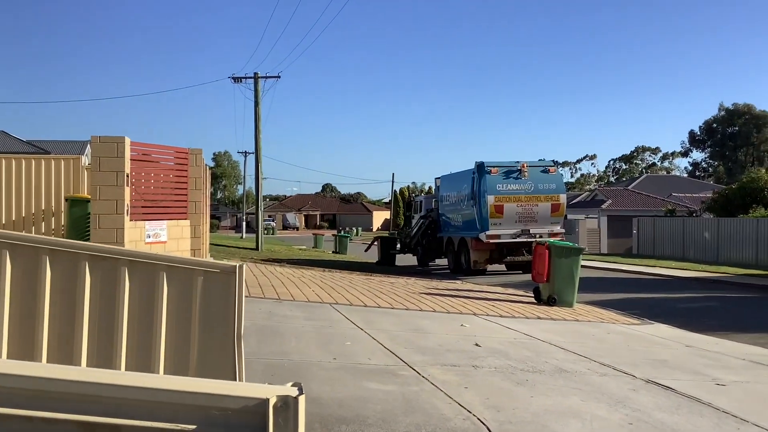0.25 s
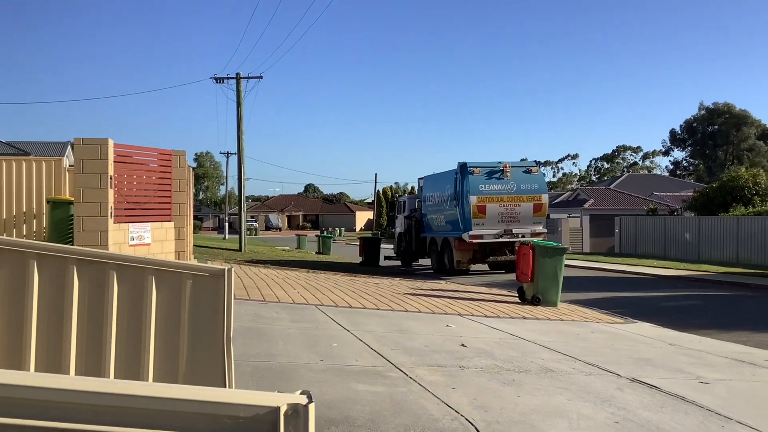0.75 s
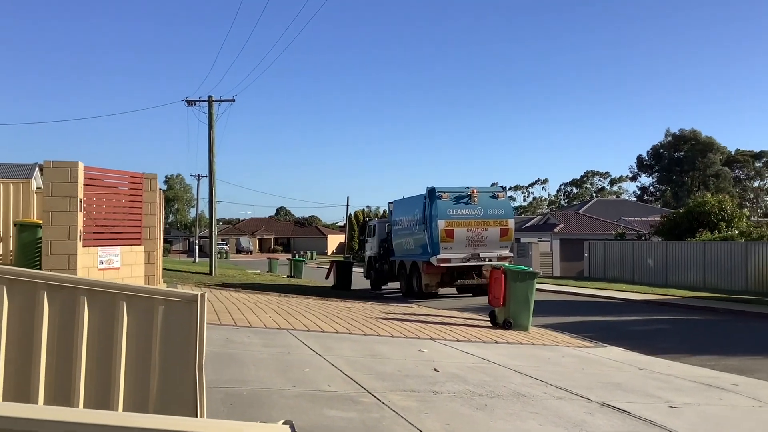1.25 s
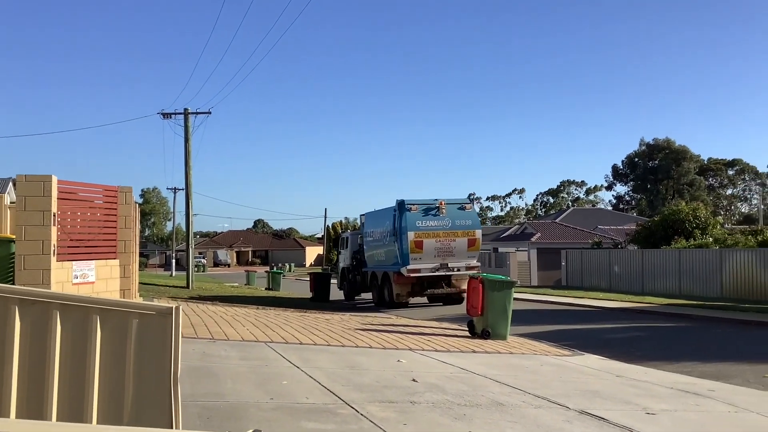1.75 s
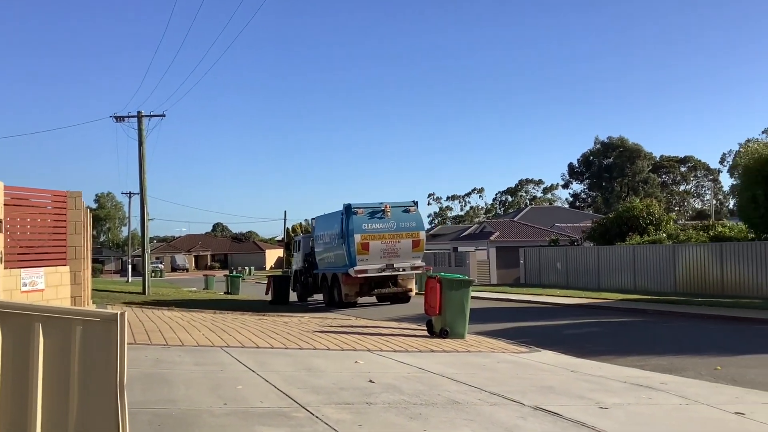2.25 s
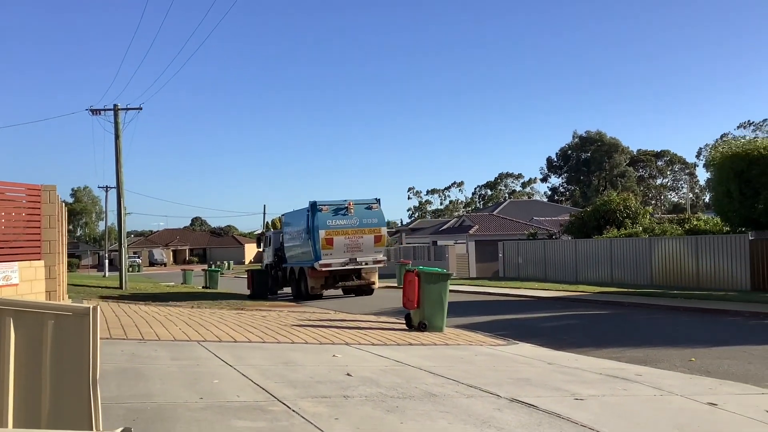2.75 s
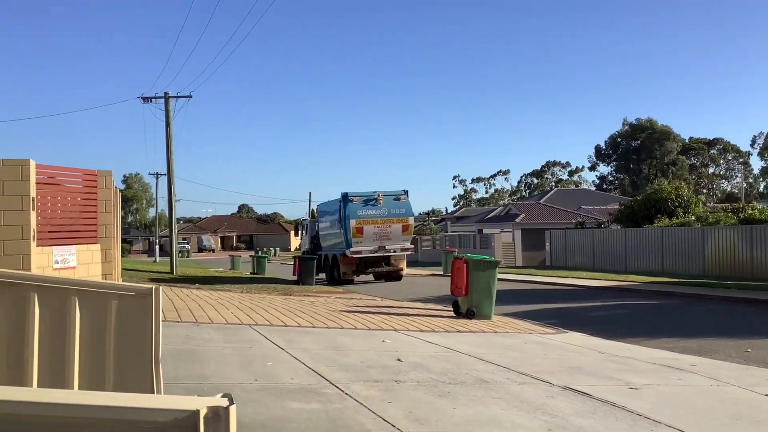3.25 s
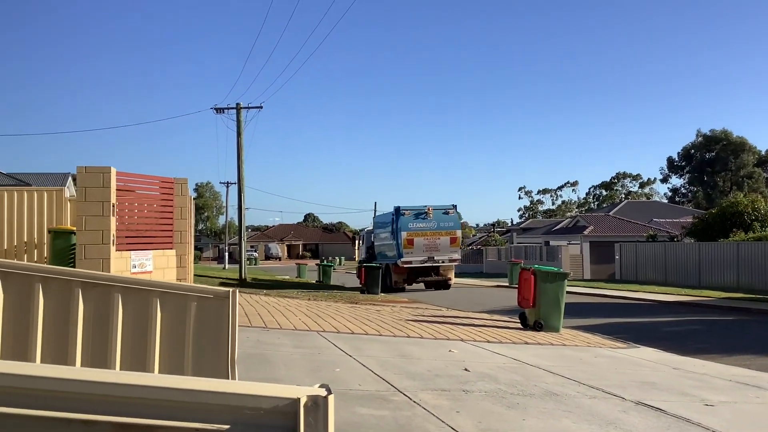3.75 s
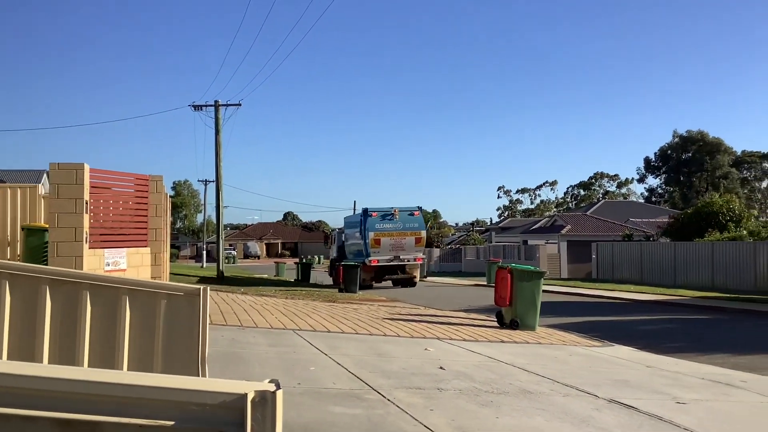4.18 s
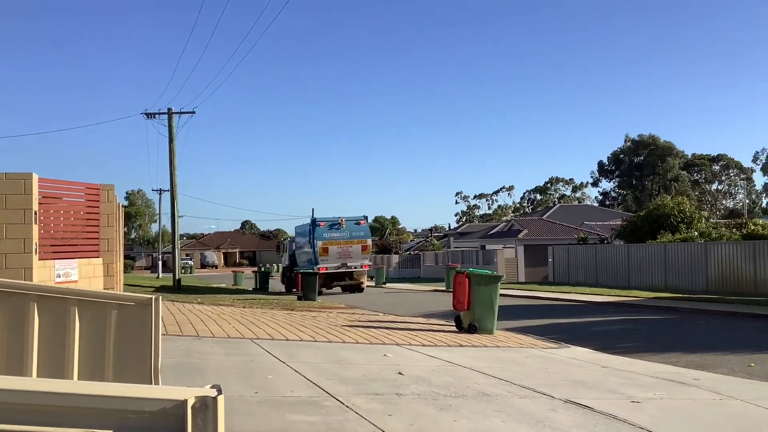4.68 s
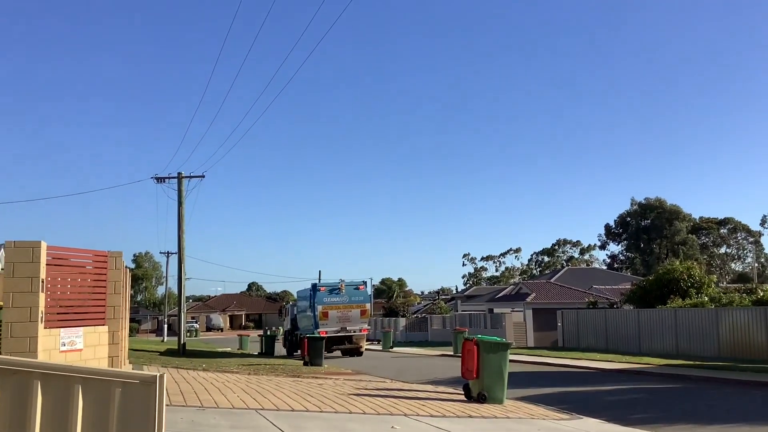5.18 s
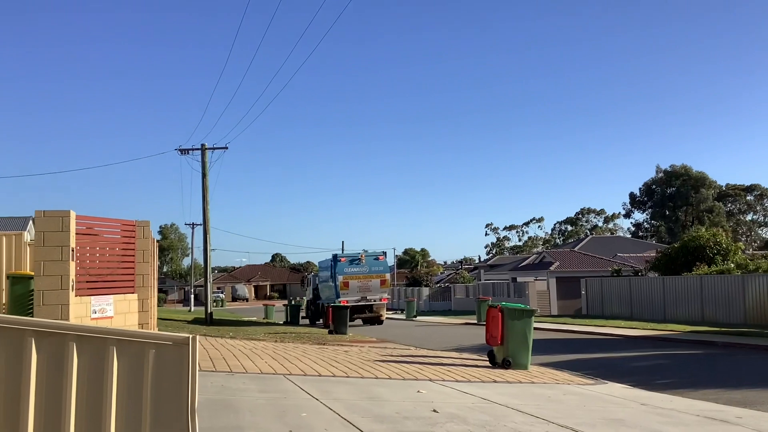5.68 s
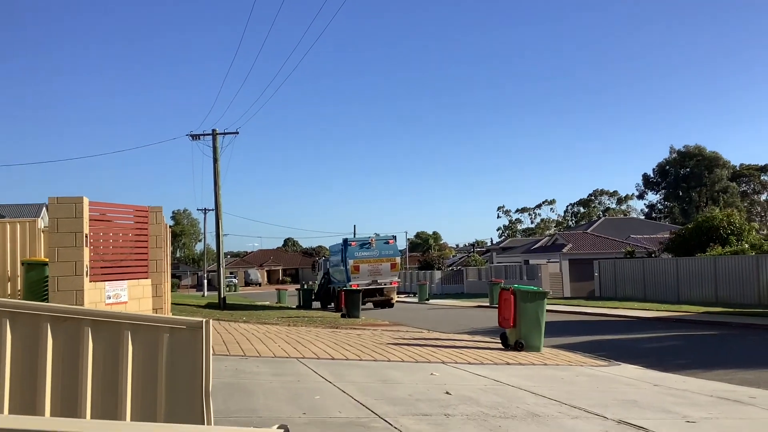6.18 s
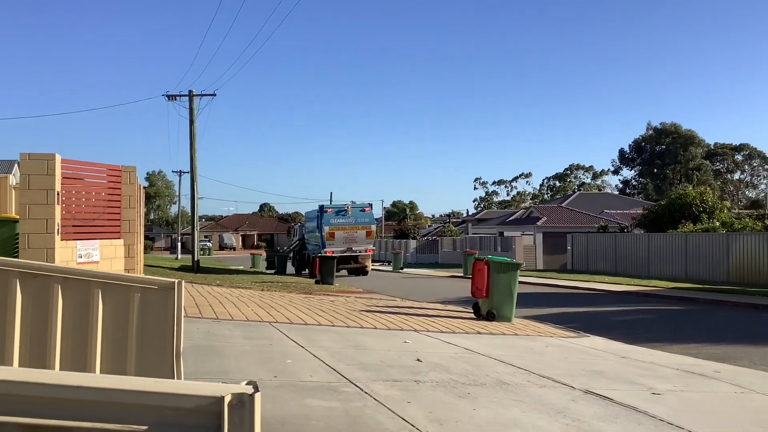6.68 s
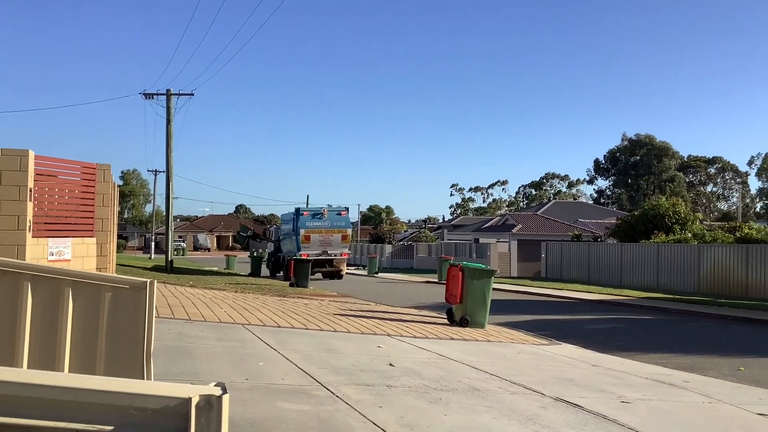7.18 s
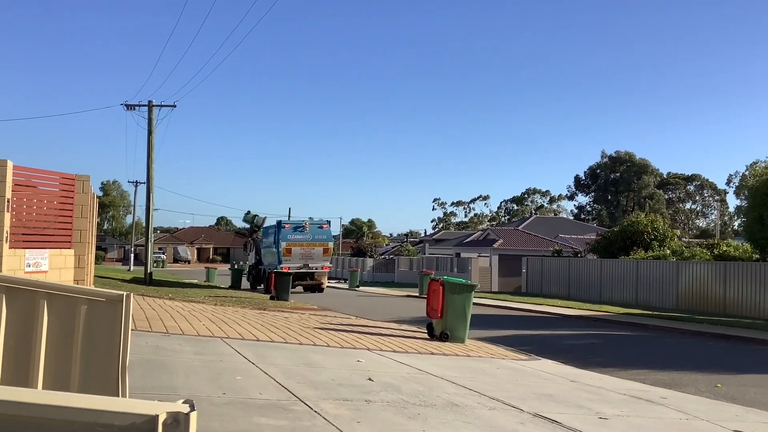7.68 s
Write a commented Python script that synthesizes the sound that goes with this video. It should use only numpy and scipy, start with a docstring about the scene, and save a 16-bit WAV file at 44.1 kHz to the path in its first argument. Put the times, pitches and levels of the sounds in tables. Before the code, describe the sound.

Outdoors on a suburban street, wind rumbles, flutters and thumps against a single phone microphone throughout. At 0 s a diesel refuse truck is running, with a short air puff and bright tick near 0.1 s. From about 0.6 s it pulls away, its growl and gear whine rising until 3.1 s under a thin, climbing turbo whistle; a longer air hiss comes at 1.2-1.5 s. The engine then drops quickly, reaching low idle by 4.7 s. Brake squeals begin around 4.1 s, high, rasping and overlapping, with a clear piercing note near 5.3 s, then fade into weaker squeaks until 6.4 s. Small air puffs sputter at 5.5-5.9 s. Steel clanks knock at 6.45-6.6 s, followed by faint regular chirps to about 7.2 s and a very faint hydraulic whine near 7.6 s. Wind is strong from 7.3 s to the end at about 7.9 s. Fences and houses lightly echo the truck.

```python
"""On a suburban street a diesel refuse truck pulls away, revs up, lifts off and stops at the next bin.
Firing pulses, crank harmonics and gear tones follow engine speed; a turbo whistle spools up and down.
Gliding tones make the brake squeals; shaped noise the air puffs, ticks and wind; decaying modes the clanks.
The lifting arm then chirps. Gusts buffet the single microphone throughout; fences and houses echo the truck."""
import sys
import numpy as np
from scipy import signal
from scipy.fft import rfft, irfft, next_fast_len
from scipy.io import wavfile
from scipy.ndimage import uniform_filter1d, minimum_filter1d, map_coordinates

SR = 44100
rng = np.random.default_rng(int(sys.argv[2]) if len(sys.argv) > 2 else 0)


def dump_mix(stems):
    """Bounce the given channels to the path in sys.argv[1] as a 16-bit WAV at rate SR."""
    frames = np.atleast_2d(stems).T  # one column per channel
    limited = np.clip(frames, -1, 1)  # hard clip at full scale
    pcm = np.round(limited * 32767).astype(np.int16)
    wavfile.write(sys.argv[1], SR, pcm)


N = 349817

# single eddies that hit the microphone port: start_s, level_db, pitch_hz
EDDIES = [(0.099, -16, 630), (0.148, -6, 201), (0.357, -11.5, 373), (0.381, -14, 417), (0.467, -10, 230),
          (0.493, -8, 204), (0.762, -9.5, 323), (1.048, -11.5, 325), (1.189, -11, 231), (1.38, -13, 291),
          (1.576, -11, 257), (1.646, -10.5, 240), (1.823, -9, 214), (1.965, -13, 292), (2.129, -10, 204),
          (2.37, -14.5, 241), (3.3, -13.5, 222), (3.683, -11, 219), (3.755, -12.5, 292), (3.871, -14, 360),
          (3.995, -12.5, 349), (4.15, -13.5, 227), (4.366, -6.5, 366), (4.553, -5, 238), (4.574, -8.5, 240),
          (4.626, -11, 330), (4.687, -7, 250), (4.718, -9.5, 357), (4.768, -15, 617), (4.84, -11.5, 505),
          (5.17, -10.5, 323), (5.4, -12, 360), (5.486, -13, 252), (5.546, -7, 506), (5.571, -14, 560),
          (5.701, -11, 633), (5.89, -8.5, 300), (5.949, -9, 377), (5.987, -14, 630), (6.107, -9.5, 242),
          (6.299, -7, 283), (6.391, -9, 489), (6.653, -9, 343), (6.984, -12, 420), (7.116, -9, 286),
          (7.278, -11, 242), (7.3, -10, 460), (7.335, -6, 296), (7.415, -7, 378), (7.438, -5, 473),
          (7.47, -10.5, 460), (7.523, -12, 300), (7.575, -10, 350), (7.613, -7.5, 605), (7.655, -5, 283),
          (7.842, -7, 267)]
SKIRT_WIDTH_HZ = 130  # noise skirt of a rasping squeal


def amp(db):
    """Decibels to gain."""
    return 10 ** (np.asarray(db) / 20)


def unit(x):
    """Scale to rms 1."""
    return x / np.sqrt(np.mean(x ** 2) + 1e-20)


def along(points, hz):
    """Interpolate (Hz, value) points on a log frequency axis."""
    f, v = np.transpose(points)
    return np.interp(np.log(hz + 1), np.log(f + 1), v)


def curves(rows):
    """One value per sample for each column after the time."""
    s, *cols = np.transpose(rows)
    return [np.interp(np.arange(N) / SR, s, c) for c in cols]


def wobble(rate, count=N):
    """A smooth random curve of count samples, rate knots a second."""
    knots = rng.standard_normal(int(count * rate / SR) + 4)
    coarse = np.arange(0, count, 16)
    return np.interp(np.arange(count), coarse, map_coordinates(knots, [coarse * rate / SR]))


def filtered(x, response):
    """x times a response of frequency."""
    m = next_fast_len(N + SR // 2)
    return irfft(rfft(x, m) * response(np.fft.rfftfreq(m, 1 / SR)), m)[:N]


def noise(spectrum):
    """Coloured noise of rms 1."""
    return unit(filtered(rng.standard_normal(N), lambda hz: amp(along(spectrum, hz))))


def steadied(x, seconds):
    """x with its slow swells evened out, so that only its fast grain is left."""
    power = uniform_filter1d(x ** 2, max(int(seconds * SR), 2))
    return x / np.sqrt(np.abs(power) + 1e-9)


def tone(hz):
    """A sine of rms 1 that follows a pitch curve."""
    return np.sqrt(2) * np.sin(2 * np.pi * (np.cumsum(hz) / SR + rng.random()))


def smear(width_hz):
    """Slow noise of rms 1; times a tone, it spreads the tone into a band."""
    return unit(filtered(rng.standard_normal(N), lambda hz: 1 / (1 + (hz / width_hz) ** 2)))


def swell(start, top, end, edge_db):
    """Sample indices and gain of a sound that grows to its loudest moment and fades."""
    i = np.arange(max(int(start * SR), 0), min(int(max(end, start + .02) * SR), N))
    gain = amp(np.interp(i / SR, [start, top, end], [edge_db, 0, edge_db]))
    return i, gain * signal.windows.tukey(len(i), .2)


def street(x):
    """Scattered echoes from fences and houses; the treble dies first."""
    # echo decay: frequency_hz, t60_s
    echo_t60 = [(200, 0.86), (2000, 0.68), (8000, 0.44), (15000, 0.14)]
    hz, t, z = signal.stft(rng.standard_normal(SR), SR, nperseg=256)
    decay = amp(-60 * t / along(echo_t60, hz)[:, None])
    tail = signal.istft(z * decay, SR, nperseg=256)[1]
    return signal.fftconvolve(x, tail / np.linalg.norm(tail))[:N]


def gust(start, length):
    """Gain of a gust: a quick rise, a hold and a fall."""
    attack_s, release_s = 0.007, 0.021
    t = np.arange(N) / SR - start
    rise = np.clip(t / attack_s + .5, 0, 1)
    return rise * np.exp(-np.clip((t - length) / release_s, 0, 20))


def lumps(rate, life):
    """Random bursts that start at once and fade in about life seconds; mean 0, rms 1."""
    kicks = (rng.random(N) < rate / SR) * rng.uniform(0.62, 1, N)
    fade = np.exp(-np.arange(SR // 10) / (SR * life))
    swirl = np.sqrt(np.abs(uniform_filter1d(signal.fftconvolve(kicks, fade)[:N], size=60)))
    return unit(uniform_filter1d(swirl - swirl.mean(), size=60))


def wind_levels():
    """Gusts and the wakes of eddies add their power to the breeze; gives rumble dB and flutter dB."""
    # steady wind between gusts: time_s, rumble_db
    breeze = [(0, -26.5), (.66, -28.5), (1.0, -29), (2.25, -33), (3.05, -30), (3.2, -32), (3.6, -30.5),
              (4.45, -29), (5.0, -32.5), (5.45, -32.5), (5.6, -30), (6.1, -26), (6.55, -28.5), (7.25, -29),
              (7.5, -24), (7.93, -22.5)]
    # gusts on the microphone: start_s, length_s, rumble_db, flutter_re_rumble_db
    gusts = [(0.1, 0.015, -30, 3), (0.209, 0.29, -28.5, 3.5), (0.463, 0.044, -25.5, -10),
             (0.738, 0.093, -24.5, 0), (0.854, 0.098, -25.5, -0.5), (1.36, 0.049, -25, -4.5),
             (1.701, 0.19, -22.5, -4.5), (1.923, 0.092, -28.5, -2), (2.089, 0.06, -27, -4),
             (2.332, 0.034, -25, -9.0), (2.509, 0.043, -23, -8.5), (2.632, 0.095, -27, -7),
             (2.884, 0.023, -28.5, -8), (3.497, 0.1, -26, -16), (3.736, 0.17, -28, -10.5),
             (4.195, 0.041, -22, -7), (4.315, 0.057, -22.5, -3.5), (4.51, 0.29, -22, -1),
             (4.767, 0.15, -28.5, -2), (5.06, 0.15, -32, 0.5), (5.358, 0.1, -29, -0.5),
             (5.52, 0.2, -25, 2.5), (5.822, 0.19, -30.5, 6), (6.069, 0.058, -27, 4),
             (6.344, 0.12, -27.5, 4), (6.44, 0.059, -28.5, -3.5), (6.622, 0.26, -27, -2),
             (6.945, 0.21, -26, -1), (7.294, 0.198, -23.5, -1.5), (7.507, 0.17, -25.5, 0),
             (7.728, 0.34, -24.3, 0.8)]
    swirl_db, swirl_per_s = 1.23, 16
    flutter_offset_db, flutter_growth = -4.5, 1.87  # flutter swings wider than rumble
    wake_db, wake_s = -17, 0.0084  # rumble that trails an eddy
    breeze_db, = curves(breeze)
    breeze_db = breeze_db + swirl_db * wobble(swirl_per_s)
    calm_db = breeze_db.mean()
    rumble = amp(breeze_db) ** 2
    flutter = amp(calm_db + flutter_offset_db + flutter_growth * (breeze_db - calm_db)) ** 2
    for start, length, db, bright_db in gusts:
        power = (amp(db) * gust(start, length)) ** 2
        rumble += power
        flutter += power * amp(bright_db) ** 2
    for s, db, _ in EDDIES:
        rumble += (amp(db + wake_db) * gust(s, wake_s)) ** 2
    return 10 * np.log10([rumble, flutter])


def lulls():
    """The flow slackens for a moment before each eddy; gives dB."""
    lull_db, lull_s = -3.5, .02
    slack = np.zeros(N)
    for s, _, _ in EDDIES:
        slack[round((s - lull_s) * SR):round(s * SR)] = 1
    return lull_db * uniform_filter1d(slack, size=180)


def wind():
    """Turbulence at the port comes in lumps: the harder a gust blows, the smaller and higher its eddies."""
    # low, middle and high turbulence spectra: frequency_hz, density_db
    rumble_spectrum = [(20, -55), (32, -39), (45, -12), (65, -2), (110, 0.5), (200, 1.5), (290, -1),
                       (420, -13), (700, -51), (1200, -74.5)]
    flutter_spectrum = [(120, -25), (240, -8.5), (340, -1), (480, 0.5), (620, -6), (800, -20), (1100, -35),
                        (2000, -63), (4000, -88)]
    sputter_spectrum = [(250, -31), (500, 3), (700, -1.5), (880, -8.5), (1100, -22.5), (1600, -45),
                        (4000, -66)]
    sputter_offset_db, sputter_growth = -6, 1.59  # sputter vanishes fast in softer gusts
    rumble_db, flutter_db = wind_levels() + lulls()
    hardest_db = flutter_db.max()
    sputter_db = hardest_db + sputter_offset_db + sputter_growth * (flutter_db - hardest_db)

    churn = lumps(rate=75, life=.007)
    rumble_grain = amp(2.47 * np.roll(churn, SR // 400) + 1.75 * wobble(50))  # the bass lags
    flutter_grain = amp(4 * churn + 1.5 * wobble(110))
    sputter_grain = amp(4.1 * churn + 3.4 * wobble(120))
    rumble = steadied(noise(rumble_spectrum) * rumble_grain, seconds=0.065)
    flutter = steadied(noise(flutter_spectrum) * flutter_grain, seconds=.07)
    sputter = steadied(noise(sputter_spectrum) * sputter_grain, seconds=0.184)
    return amp(rumble_db + 0.63) * rumble + amp(flutter_db - 1.53) * flutter + amp(sputter_db) * sputter


def booms():
    """The broadest gusts shake the microphone in the deep bass."""
    # broad gusts: start_s, length_s, level_db
    broad_gusts = [(0, 0.25, -30), (3.52, 0.28, -32), (5.628, 0.1, -24)]
    # boom spectrum: frequency_hz, density_db
    boom_spectrum = [(20, -40), (35, -14), (50, -7), (75, 0), (110, -3), (200, -18), (400, -70)]
    pressure = sum(amp(db) * gust(start, length) for start, length, db in broad_gusts)
    return pressure * steadied(noise(boom_spectrum), seconds=0.095)


def growl(firing_hz):
    """Unequal cylinders give a crowd of faint, wavering harmonics of the crankshaft."""
    turns = np.cumsum(firing_hz * (1 + .003 * wobble(40))) / SR
    orders = np.arange(7, 31, 2 / 3)  # multiples of the firing rate
    return sum(amp(3 * wobble(5)) * np.sin(2 * np.pi * (k * turns + rng.random())) for k in orders)


def gear_whine(firing_hz):
    """Gears and accessories whine at fixed multiples of the firing rate, coloured by the casing."""
    # gear and accessory tones: firing_rate_multiple, level_db
    gears = [(4, -7), (7, -4), (10.3, -11), (12.4, -11), (14.27, 1), (15.3, -9), (21, -11), (22.6, -6),
             (28.5, -1), (43, -9.5)]
    # casing radiation: frequency_hz, gain_db
    casing = [(600, 2), (780, 5), (960, 6.5), (1040, 0), (1140, -5), (1220, 1.5), (1275, 1), (1325, 6),
              (1385, -1), (1500, -3), (1620, 1), (1800, -2), (2000, 2.5), (2350, -.5), (2500, -8),
              (2800, -9), (4000, -6)]
    backlash, flicker_db = .0055, 2.4
    whine = np.zeros(N)
    for multiple, db in gears:
        hz = multiple * firing_hz * (1 + backlash * wobble(130))  # play between the teeth wavers the pitch
        whine += amp(db + along(casing, hz) + flicker_db * wobble(32)) * tone(hz)
    whine *= 1 + 0.29 * tone(firing_hz) + 0.11 * tone(firing_hz / 2)  # torque pulses add side tones
    return .85 * whine + .5 * street(whine)


def engine():
    """Each firing pushes the exhaust and pulses the combustion noise; crank and gears add harmonics."""
    # engine speed: time_s, firing_rate_hz
    speed = [(0, 50), (.62, 49.5), (1.5, 70.5), (2, 80), (3.1, 99.6), (3.25, 85), (3.5, 71.3), (3.65, 63),
             (4, 50.5), (4.65, 36), (7.93, 36)]
    # engine loudness, pulling away to idle: time_s, level_db
    effort = [(0, -41.5), (.6, -44.5), (.72, -42), (1.45, -40.5), (2.2, -40.5), (2.6, -39), (3.1, -39.5),
              (3.25, -44), (3.6, -46.5), (4.2, -50), (5.4, -48.5), (7.93, -48)]
    # combustion noise spectrum: frequency_hz, density_db
    diesel_spectrum = [(40, -12), (90, 19.5), (250, 5), (600, 9.5), (1000, 4.5), (1500, 0), (2200, -1),
                       (3000, -4), (4500, -5), (5900, -5), (6400, -12), (9500, -16.5), (12000, -23),
                       (15700, -33)]
    exhaust_full_db, exhaust_growth = -36.5, 1.4  # growth: dB per dB of effort
    whine_full_db, whine_growth = -49, 1.05
    whine_full_hz, whine_fade_db_per_hz = 53.1, 1.5  # whine fades below this firing rate
    crank_full_db = -64
    firing_hz = curves(speed)[0] * (1 + 0.002 * wobble(24.93))
    noise_db, = curves(effort)
    effort_db = noise_db - noise_db.max()

    exhaust_db = exhaust_full_db + exhaust_growth * effort_db + 1.4 * wobble(10.83)
    exhaust = tone(firing_hz) + amp(-13.0) * tone(2 * firing_hz)
    whine_db = whine_full_db + whine_growth * effort_db
    whine_db = whine_db - whine_fade_db_per_hz * np.maximum(whine_full_hz - firing_hz, 0)
    knock = 1 + 0.04 * tone(firing_hz) + 0.037 * tone(firing_hz / 2)
    combustion = amp(noise_db + 5.5 + 0.44 * wobble(11)) * knock * noise(diesel_spectrum)
    harmonics = amp(crank_full_db + effort_db) * growl(firing_hz)
    return combustion + harmonics + amp(exhaust_db) * exhaust + amp(whine_db) * gear_whine(firing_hz)


def turbo():
    """The compressor spools up and runs down; speed smears its whistle and lifts turbine and intake hiss."""
    # compressor whistle: time_s, blade_tone_hz, level_db
    compressor = [(0, 6080, -56), (.25, 6000, -59), (.36, 5930, -51), (.62, 5900, -58), (.8, 6500, -58),
                  (1.25, 8100, -59), (1.45, 9100, -53), (2.1, 11700, -62), (2.95, 15300, -68),
                  (3.08, 16300, -74), (3.2, 14900, -68), (3.55, 12300, -71), (3.95, 10200, -64),
                  (4.15, 9400, -68), (4.7, 7500, -100)]
    # intake hiss spectrum: frequency_hz, density_db
    intake_spectrum = [(5000, -25), (8000, 0), (11000, -2), (15700, -17)]
    smear_hz, turbine_share = 330, .595  # turbine pitch as a share of the blade tone
    turbine_db, intake_db, spool_db_per_hz = -58.5, -60, .0022  # levels at top speed; fall below it
    hz, db = curves(compressor)
    rough = np.interp(hz, [5900, 7000], [.25, 1])
    spread = np.sqrt(1 - rough) + np.sqrt(rough) * smear(smear_hz)
    blades = amp(db + 2.2 * wobble(30)) * spread * tone(hz * (1 + 0.0039 * wobble(200)))
    turbine = amp(turbine_db) * smear(smear_hz) * tone(turbine_share * hz)
    intake = amp(intake_db) * noise(intake_spectrum)
    return blades + amp(spool_db_per_hz * (hz - hz.max())) * (turbine + intake)


def eddies():
    """A large eddy thumps the microphone for a few cycles that fall in pitch."""
    thump_db, rise_s, pitch_fall = -2, .0024, .7
    out, t = np.zeros(N + SR), np.arange(SR // 20) / SR
    u = t / rise_s
    thump = u * np.exp(1 - u)
    for (s, db, hz), turn in zip(EDDIES, rng.random(len(EDDIES))):
        pitch_hz = hz * (1 + pitch_fall * (np.exp(-u) - .5))
        cycles = np.sin(2 * np.pi * (np.cumsum(pitch_hz) / SR + turn))
        out[round(s * SR):][:len(t)] += amp(db + thump_db) * thump * cycles
    return filtered(out[:N], lambda hz: 1 / (1 + (hz / 900) ** 8))


def air():
    """Valves of the air system vent in short hisses."""
    # puffs of compressed air: start_s, loudest_s, end_s, level_db
    puffs = [(.122, .132, .155, -34), (1.17, 1.35, 1.51, -35), (1.385, 1.408, 1.43, -35),
             (5.52, 5.535, 5.555, -44), (5.555, 5.572, 5.60, -44), (5.61, 5.625, 5.645, -40),
             (5.66, 5.70, 5.715, -44), (5.72, 5.73, 5.745, -45), (5.775, 5.805, 5.855, -37.5),
             (5.85, 5.872, 5.925, -38), (6.42, 6.55, 6.74, -46), (7.68, 7.78, 7.92, -50)]
    # jet noise spectrum: frequency_hz, density_db
    jet_spectrum = [(700, 0), (1500, 5.5), (2600, -0.5), (3500, 3.5), (4400, 8.5), (5300, 3), (6600, -7),
                    (10000, -15.5), (15000, -35)]
    flow = np.zeros(N)
    for start, top, end, db in puffs:
        i, gain = swell(start, top, end, edge_db=-11.0)
        flow[i] += amp(db) * gain
    grit = unit(amp(3 * wobble(220)))  # sputter of the jets
    return flow * grit * noise(jet_spectrum)


def ticks():
    """Loose fittings snap against the body in short bright ticks."""
    # snaps: start_s, level_db
    snaps = [(.126, -33), (.137, -39), (.399, -49), (.809, -37), (1.406, -38), (3.619, -44)]
    # tick spectrum: frequency_hz, density_db
    tick_spectrum = [(1500, -14), (4000, 5), (6000, -8), (7600, 2), (9500, -13), (11500, -8), (15500, -22)]
    t60_s = 0.034
    strength, t = np.zeros(N + SR), np.arange(SR // 10) / SR
    for s, db in snaps:
        strength[round(s * SR):][:len(t)] += amp(db - 60 * t / t60_s)
    return strength[:N] * noise(tick_spectrum)


def squeal(start, length, pitch_hz, glide_hz, db, rasp, screech):
    """One mode sings; uneven grip makes it waver, flutter, beat with a close twin and spread to a screech."""
    loudest_share, rasp_waver_hz, skirt_db = 0.51, 60, -5.5
    twin_db, twin_split_hz = -4, (70, 190)
    out = np.zeros(N)
    i, gain = swell(start, start + loudest_share * length, start + length, edge_db=-8.5)
    n = len(i)
    waver_hz = rasp * rasp_waver_hz * (.8 * wobble(400, n) + .6 * wobble(45, n))
    hz = pitch_hz + np.linspace(0, glide_hz, n) + waver_hz
    grip_db = 1.1 + 1.8 * rasp
    grip = unit(amp(grip_db * wobble(70, n) + grip_db * wobble(240, n)))
    skirt = np.sqrt(rasp) * amp(skirt_db) * screech[rng.integers(N - n):][:n]
    twin = rasp * amp(twin_db) * tone(hz + rng.choice([-1, 1]) * rng.uniform(*twin_split_hz))
    octave = amp(-31) * tone(2 * hz) * (2 * hz < SR / 2)
    out[i] = gain * amp(db) * grip * unit((1 + skirt) * tone(hz) + twin + octave)
    return out


def brakes():
    """The linings set drum modes singing in turn, some pure, some rasping, among a crowd of fainter ones."""
    # squeals: start_s, length_s, pitch_hz, glide_hz, level_db, rasp_0_to_1
    squeals = [ (4.14, .16, 8590, 30, -41.5, .7), (4.22, .18, 8620, 330, -39.5, .8),
               (4.33, .46, 9050, 400, -47, 1), (4.30, .16, 8000, -250, -43.5, .7),
               (4.39, .19, 7950, -430, -35.5, .6), (4.41, .12, 8720, 0, -37.5, .2),
               (4.50, .30, 8830, 200, -39, .8), (4.51, .08, 7100, 0, -40, .5),
               (4.57, .19, 6950, 300, -34.5, .6), (4.55, .19, 7650, 130, -42, .7),
               (4.58, .52, 10420, 400, -50, .7), (4.655, .07, 4490, 0, -42, .25),
               (4.69, .08, 7980, 40, -36.5, .2), (4.70, .20, 7220, 200, -44, .7),
               (4.71, .22, 8280, 80, -39, .6), (4.72, .33, 8800, -300, -44, 1),
               (4.74, .18, 7780, 60, -45, .5), (4.85, .32, 6310, 150, -42, .7),
               (4.86, .28, 12680, 170, -54, .7), (4.87, .24, 8150, 60, -45, .6),
               (4.94, .17, 6600, 0, -46, .6), (5.01, .18, 8920, 220, -35, .25),
               (5.08, .42, 11330, 130, -49, .7), (5.12, .25, 8306, 0, -39.5, .1),
               (5.13, .20, 7725, 0, -39, .3), (5.24, .23, 7728, 0, -28, .04), (5.17, .09, 5380, 0, -43, .4),
               (5.25, .13, 5385, 0, -31.5, .02), (5.37, .17, 5385, 0, -42, .15),
               (5.20, .27, 8880, 130, -42, .6), (5.21, .11, 6400, 0, -47, .2),
               (5.24, .28, 9930, -60, -47, .6), (5.27, .08, 5670, 0, -48, .2),
               (5.34, .20, 9690, -40, -40, .2), (5.36, .07, 4310, 0, -53, .1),
               (5.44, .09, 6400, 0, -48, .2), (5.43, .14, 8750, -130, -46, .7),
               (5.46, .20, 7780, 0, -41, .8), (5.50, .14, 9050, 0, -47, .8),
               (5.53, .13, 10480, -250, -54, .7), (5.58, .13, 8780, -200, -47, .8),
               (5.65, .30, 7830, -60, -48, .9), (5.88, .08, 8730, 80, -50, .3),
               (5.92, .08, 10730, 0, -56, .3), (5.94, .20, 8960, 250, -46, 1),
               (5.95, .20, 8310, 60, -42, .1), (5.97, .17, 7820, 30, -52, .2),
               (5.99, .18, 10030, 0, -51, .1), (6.10, .26, 9330, 350, -48, .4),
               (6.12, .19, 8400, 170, -40, .2), (6.13, .21, 8910, 40, -50, .2),
               (6.08, .22, 11150, 30, -57, .3), (6.16, .18, 10960, 10, -48, .1),
               (6.17, .16, 7983, 0, -41.5, .05), (6.18, .16, 12370, 0, -59, .2)]
    # pedal presses that wake the fainter modes: start_s, end_s, level_db
    presses = [(4.353, 5.72, -52), (5.862, 6.4, -66)]
    modes_per_s, mode_length_s, mode_rasp = 30, 0.17, 0.65
    mode_centre_hz, mode_spread = 8780, .1  # spread in natural log of pitch
    screech = smear(SKIRT_WIDTH_HZ)
    out = sum(squeal(*row, screech) for row in squeals)
    for start, end, db in presses:
        onsets = np.arange(start, end - mode_length_s, 1 / modes_per_s)
        for s, (place, drift) in zip(onsets, rng.standard_normal((len(onsets), 2))):
            pitch_hz = mode_centre_hz * np.exp(mode_spread * place)
            mode_db = db - 3 * abs(place)
            out += squeal(s, mode_length_s, pitch_hz, 150 * drift, mode_db, mode_rasp, screech)
    return out


def arm():
    """Loose steel of the lifting arm knocks and rings briefly."""
    # clanks: start_s, level_db
    clanks = [(5.228, -47), (5.529, -55), (5.696, -43), (6.443, -38), (6.472, -27.5), (6.52, -38),
              (6.571, -33.5), (6.597, -34.5)]
    # steel modes: frequency_hz, level_db, t60_s
    steel = [(1134, 3, .07), (1433, 1.5, 0.13), (1525, 7, 0.06), (1675, -1, 0.093), (2145, 2, 0.14),
             (2250, -9, .12), (2704, -6, .12), (3000, -6, 0.4)]
    out, t = np.zeros(N + SR), np.arange(SR // 3) / SR
    for s, db in clanks:
        ring = np.zeros(len(t))
        for hz, level_db, t60_s in steel:
            decay = amp(level_db + rng.normal(0, 2.3) - 60 * t / t60_s)
            ring += decay * np.sin(2 * np.pi * (hz * t + rng.random()))
        crack = amp(-60 * t / 0.13) * rng.standard_normal(len(t))
        out[round(s * SR):][:len(t)] += amp(db) * (0.2 * ring + 2.0 * crack)
    return filtered(out[:N], lambda hz: 1 / (1 + (hz / 2300) ** 8))


def hydraulics():
    """The moving arm gives a steady row of fading chirps, then oil sings faintly in its valve."""
    # valve tones: start_s, length_s, pitch_hz, glide_hz, level_db, rasp_0_to_1
    valve = [(7.52, .41, 5180, 0, -58, 1), (7.72, .2, 5070, 0, -58, .5)]
    start_s, end_s, gap_s = 6.525, 7.25, .125
    length_s, pitch_hz, first_db, fade_db_per_s = .055, 2930, -53, 12
    screech = smear(SKIRT_WIDTH_HZ)
    out = sum(squeal(*row, screech) for row in valve)
    for s in np.arange(start_s, end_s, gap_s):
        chirp_db = first_db - fade_db_per_s * (s - start_s)
        out += squeal(s, length_s, pitch_hz, 0, chirp_db, .5, screech)
    return out


def scene():
    """The truck and its echoes over the street's hush, with wind on top."""
    # street hush spectrum: frequency_hz, density_db
    hush_spectrum = [(60, -4), (600, 16), (1500, -9), (3000, -13), (5300, 3), (6050, -1), (6400, 0.5),
                     (9000, 1), (12000, -9.5), (15700, -25.5)]
    whistles = brakes() + turbo() + hydraulics()
    knocks = air() + arm() + ticks()
    echoes = street(amp(-10.5) * whistles + amp(-8.0) * knocks)
    truck = engine() + amp(-2.0) * (whistles + knocks) + echoes
    hush = amp(-56.5) * noise(hush_spectrum)
    return (truck + hush + wind() + eddies() + booms())[None]


def record(dry):
    """The phone cuts the deepest bass, rounds off the hardest thumps and keeps nothing above its band limit."""
    top_hz, limit = 15750, .52
    x = filtered(dry[0], lambda hz: 1 - 1 / (1 + (hz / 36) ** 6))
    needed = 1 / np.maximum(np.abs(x) / limit, 1)
    gain = uniform_filter1d(minimum_filter1d(needed, size=600), size=400)  # peak limiter
    return filtered(x * gain, lambda hz: hz < top_hz)[None]


dry = scene()
out = record(dry)
dump_mix(out)
```